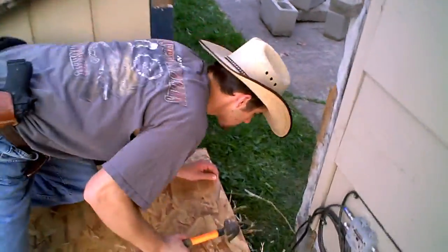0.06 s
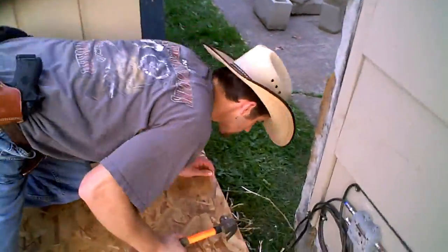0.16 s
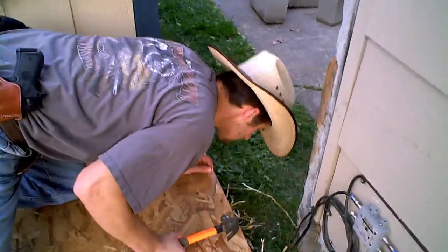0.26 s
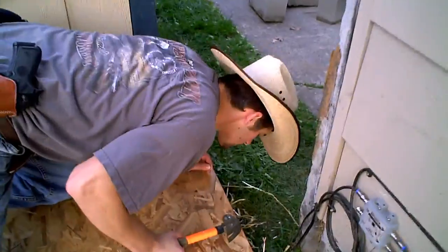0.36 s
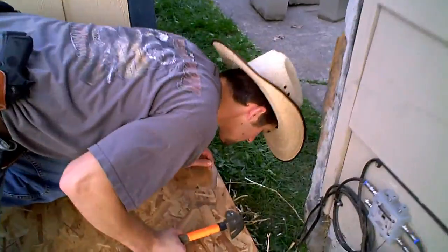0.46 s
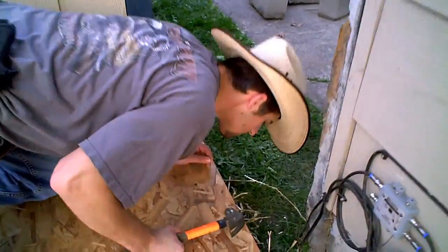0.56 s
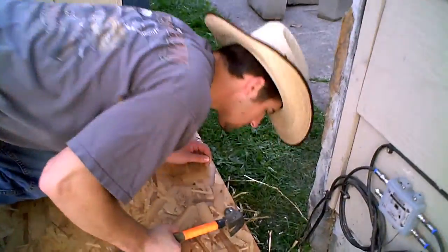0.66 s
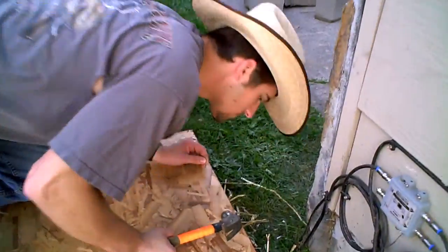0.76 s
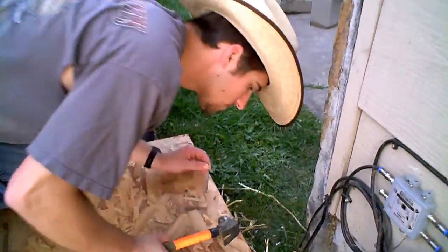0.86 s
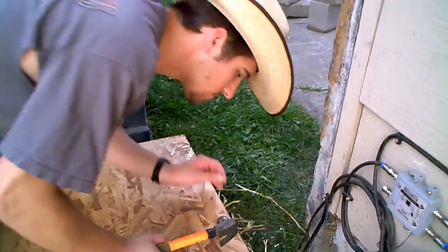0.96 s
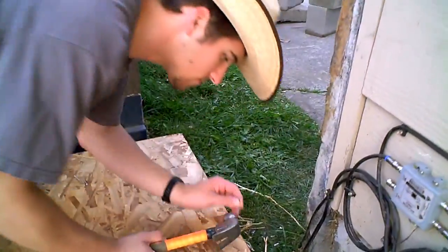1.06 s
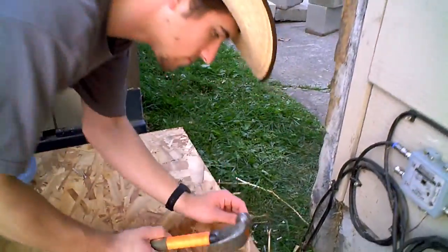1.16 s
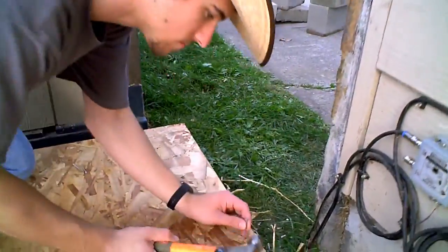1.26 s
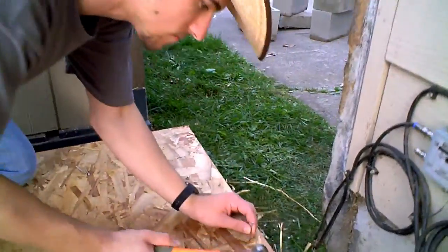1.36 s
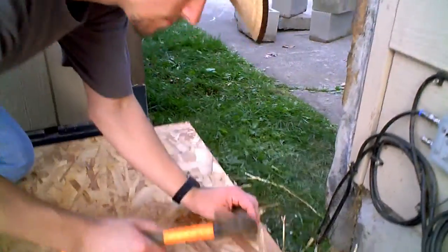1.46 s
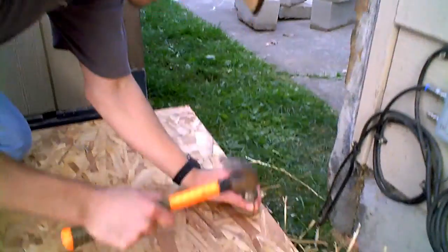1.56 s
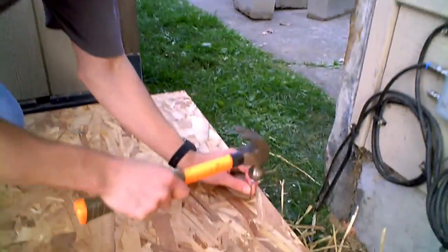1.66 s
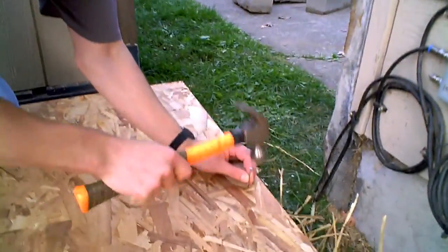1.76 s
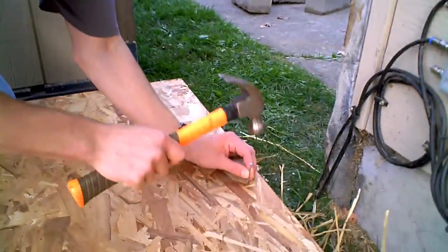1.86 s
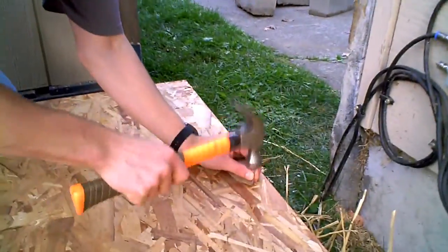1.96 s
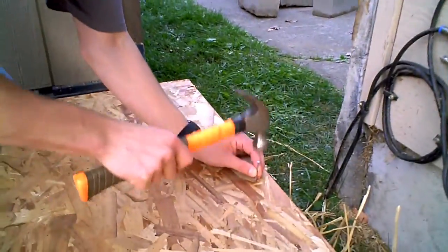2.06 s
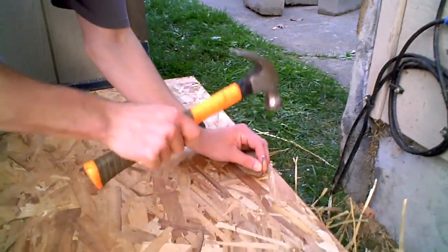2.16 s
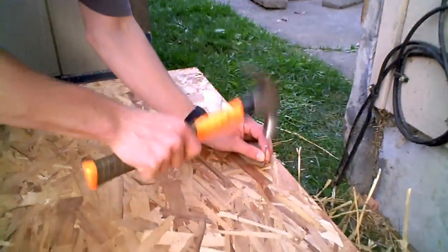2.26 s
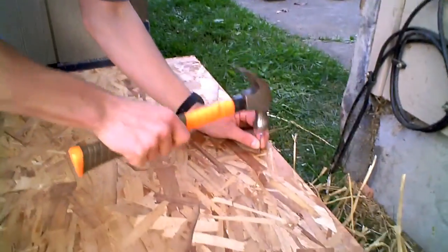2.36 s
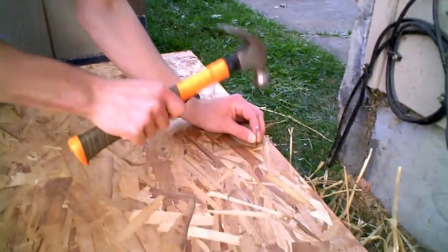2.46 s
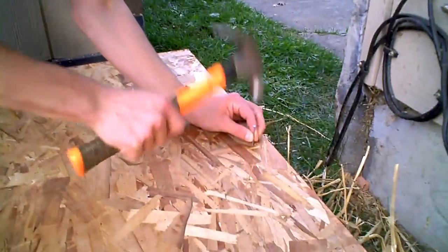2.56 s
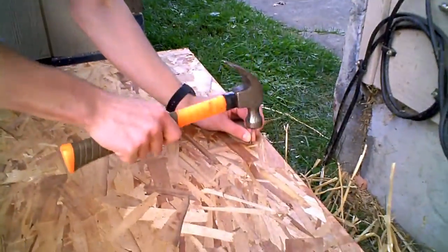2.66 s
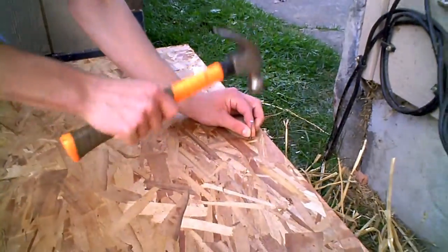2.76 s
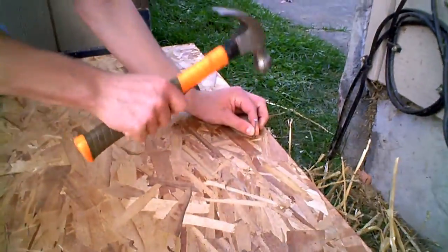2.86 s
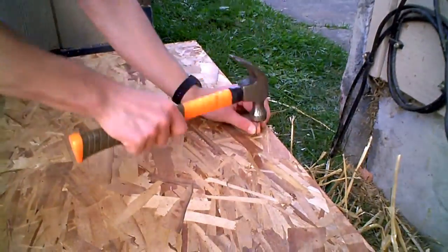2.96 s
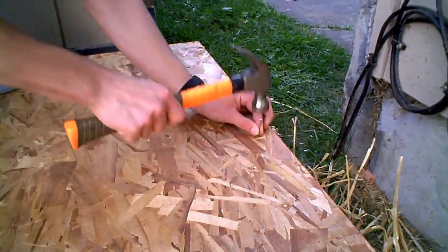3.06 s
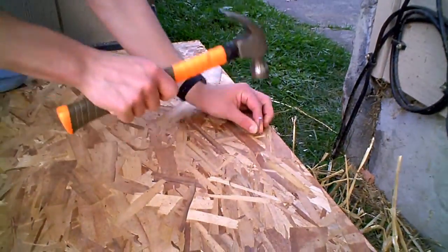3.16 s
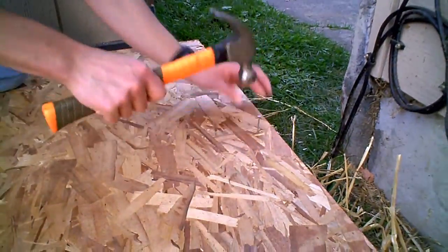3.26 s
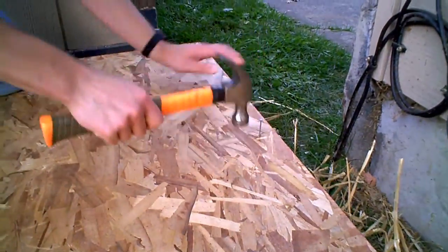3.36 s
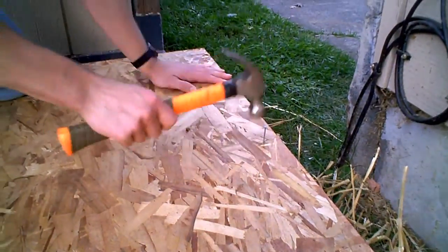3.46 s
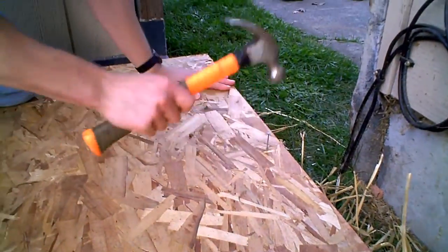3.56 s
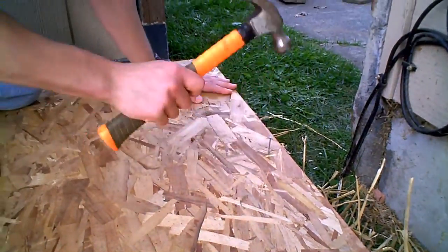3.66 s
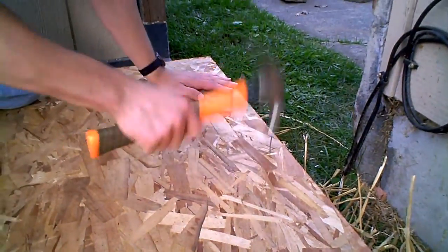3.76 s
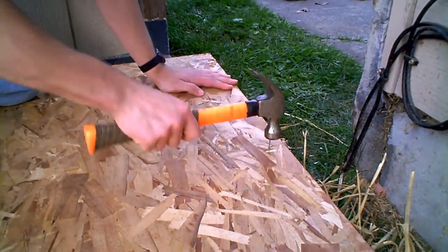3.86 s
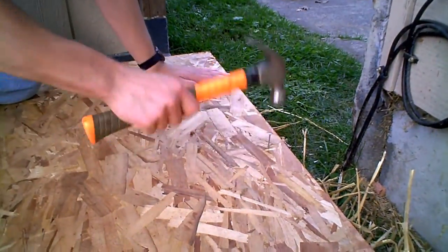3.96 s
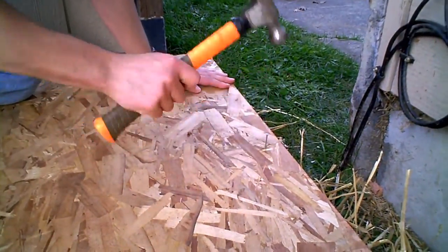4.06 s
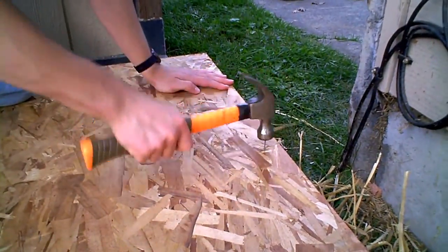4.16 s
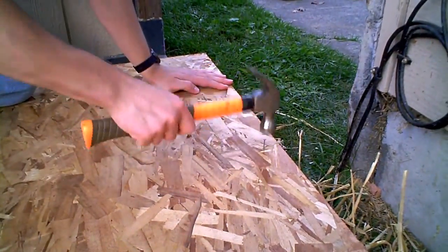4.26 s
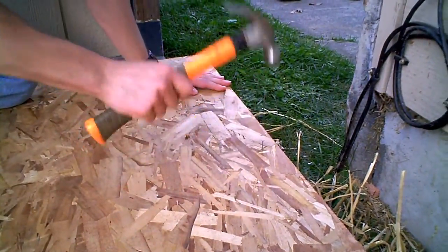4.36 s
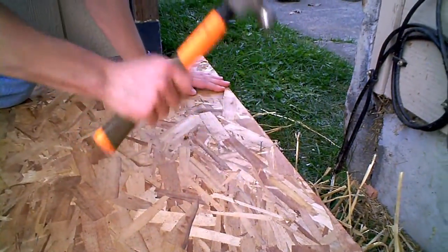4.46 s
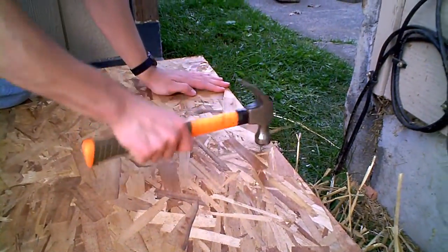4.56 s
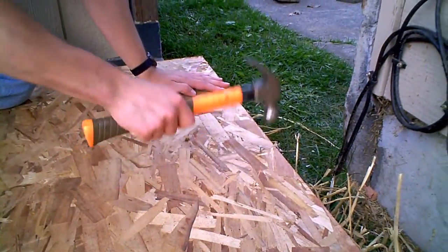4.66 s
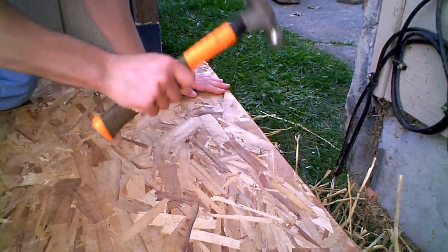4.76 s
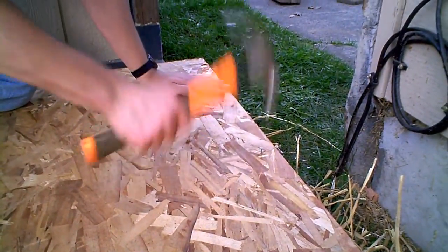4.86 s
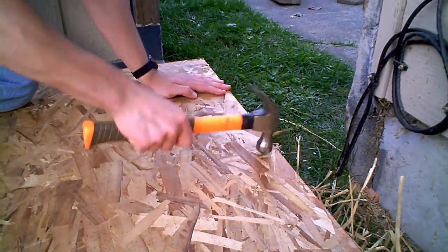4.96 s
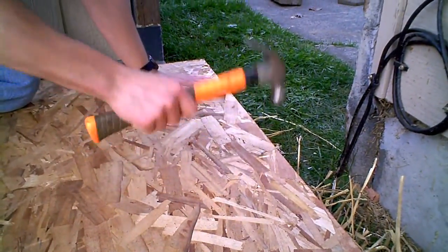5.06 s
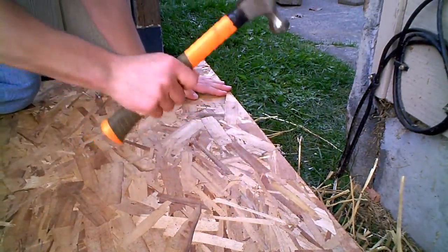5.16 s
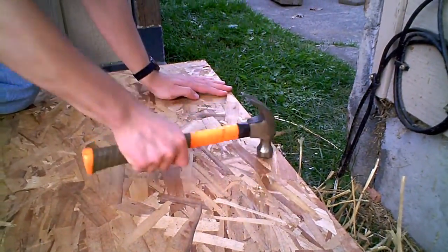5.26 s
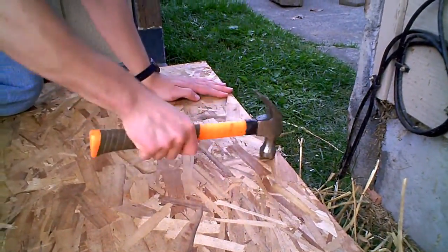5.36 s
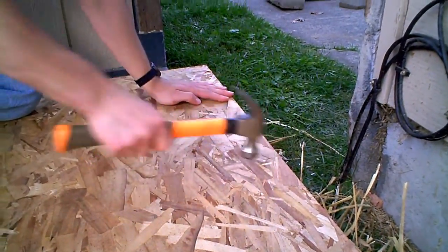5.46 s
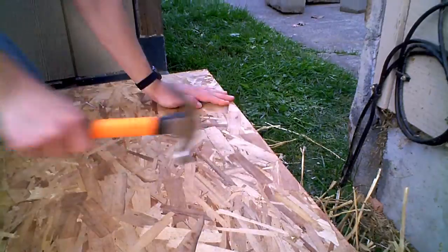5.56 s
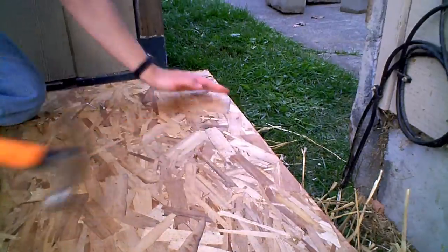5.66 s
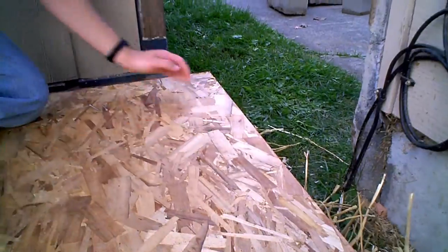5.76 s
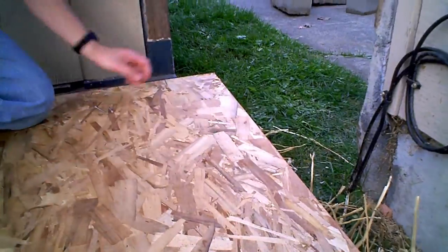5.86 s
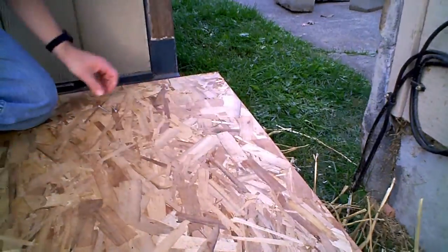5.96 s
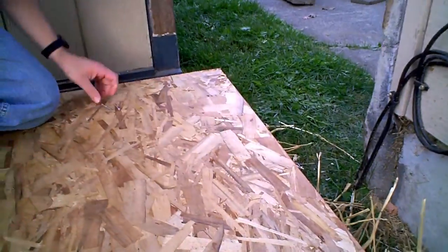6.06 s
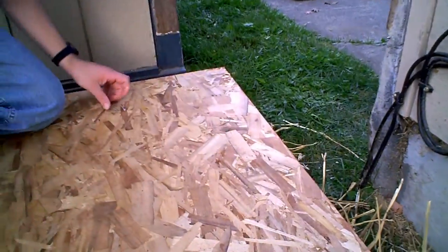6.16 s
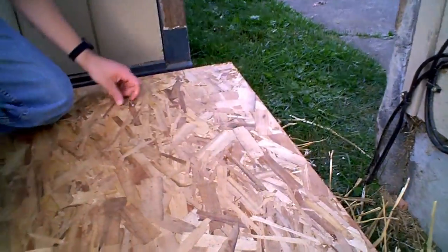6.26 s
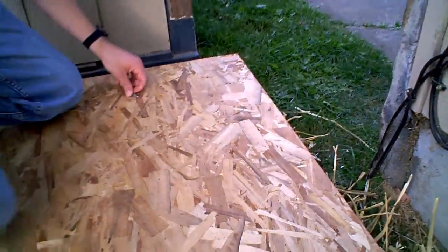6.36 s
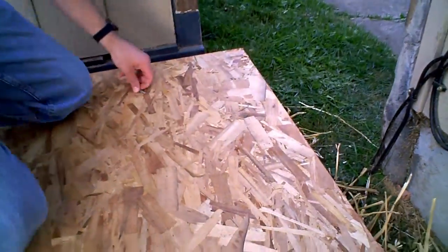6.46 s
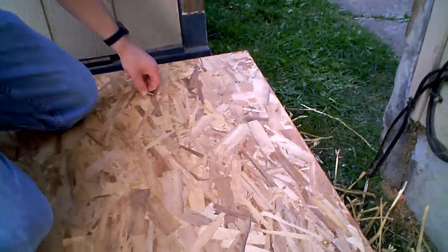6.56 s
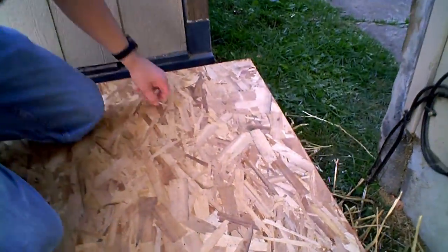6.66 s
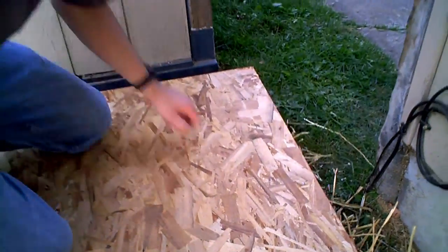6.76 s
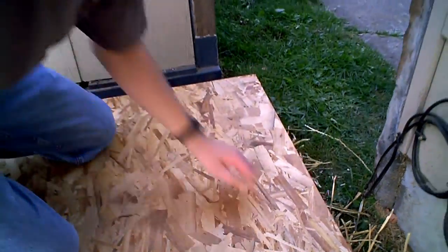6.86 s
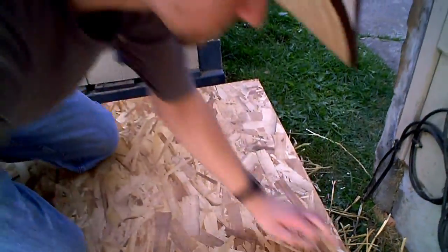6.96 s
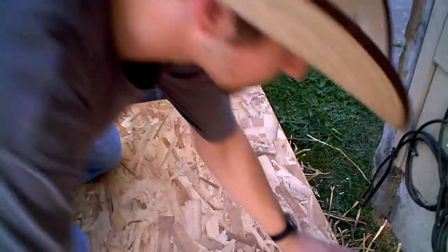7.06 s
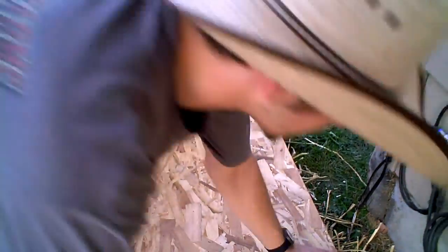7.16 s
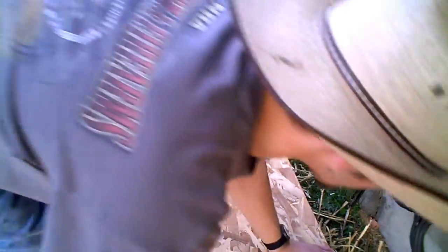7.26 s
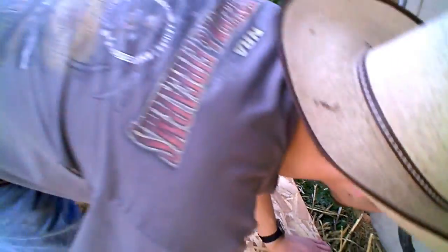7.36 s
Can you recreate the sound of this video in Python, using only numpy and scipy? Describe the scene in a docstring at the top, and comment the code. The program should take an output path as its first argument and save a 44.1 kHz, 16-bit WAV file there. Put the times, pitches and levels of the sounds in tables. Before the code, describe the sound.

Close, overloaded outdoor microphone. Over a low traffic wash and faint hum, light bumps and a soft rustle come first. Then a hammer strikes a nail in a strand board: four blows, growing quickly louder, with loose nails clicking and tinkling between them, a short pause, and five full, hard blows. Afterward come brushing, a sharp nail click, and a heavier knock on the board at the end.

```python
"""Hammering a nail into strand board

A claw hammer starts a nail in a sheet outdoors and drives it home in nine blows that overload the close
microphone: board noise and modes, a steel ring, swells of air. Loose nails click and ring as they skitter;
hands and knees bump the board or brush it as uneven noise. Behind lie a traffic wash, a faint hum and
far engine whines. Table levels apply ahead of record().
"""
import sys
import numpy as np
from scipy import signal
from scipy.fft import rfft, irfft, next_fast_len
from scipy.io import wavfile
from scipy.ndimage import uniform_filter1d

SR = 44100
rng = np.random.default_rng(int(sys.argv[2]) if len(sys.argv) > 2 else 0)


def store_wav(level_fs):
    """Save 16-bit WAV to argv[1]."""
    pcm = np.round(np.clip(np.atleast_2d(level_fs), -1, 1) * 32767)
    wavfile.write(sys.argv[1], SR, pcm.T.astype(np.int16))


N = 326781
CLOCK = np.arange(N) / SR   # s
AGE = CLOCK[:SR // 2]   # s since a contact
EDGES_HZ = 45 * 2 ** np.arange(0, 9, .5)   # half octaves
BANDS = [(np.sqrt(low * high), signal.butter(2, [low, high], "band", fs=SR, output="sos"))
         for low, high in zip(EDGES_HZ, EDGES_HZ[1:])]   # centre in Hz, filter


def from_db(db):
    """Decibels to gain."""
    return 10 ** (np.asarray(db) / 20)


def rms_one(x):
    """Scale to unit rms."""
    return x / np.sqrt(np.mean(x ** 2) + 1e-20)


def in_time(rows):
    """Each column of a curve at every sample."""
    s, *columns = np.transpose(rows)
    return [np.interp(CLOCK, s, c) for c in columns]


def at_hz(rows, hz):
    """Each column of a spectrum table at the given frequencies, interpolated in log frequency."""
    points, *columns = np.transpose(rows)
    return [np.interp(np.log(hz), np.log(points), c) for c in columns]


def add(track, s, sound):
    """Mix a sound in at a time in seconds."""
    start = max(round(s * SR), 0)
    track[start:start + len(sound)] += sound[:N - start]


def noise(spectrum, size):
    """Gaussian noise of a given colour, rms 1."""
    length = next_fast_len(size)
    hz = np.maximum(np.fft.rfftfreq(length, 1 / SR), 1)
    white = rfft(rng.standard_normal(length))
    coloured = irfft(white * from_db(at_hz(spectrum, hz)[0]), length)
    return rms_one(coloured[:size])


def drift(rate_hz):
    """Slow random wandering with a spread near 1, rate_hz knots a second."""
    knots = rng.standard_normal(N // 20)
    return np.interp(CLOCK * rate_hz, np.arange(len(knots)), knots)


def decay(t60_s):
    """An envelope that falls 60 dB in t60_s."""
    return np.exp(-np.log(1000) * AGE / t60_s)


def mode(hz, t60_s):
    """One struck resonance: a decaying sine."""
    return np.sin(2 * np.pi * hz * AGE) * decay(t60_s)


def swell(length_s, attack, release):
    """Linear rise, hold and fall; attack and release are shares of the length."""
    progress = np.linspace(0, 1, int(length_s * SR))
    return np.clip(np.minimum(progress / attack, (1 - progress) / release), 0, 1)


def tone(hz, waver):
    """A sine whose pitch wavers by a relative spread, rms 1."""
    phase_cycles = np.cumsum(hz * (1 + waver * drift(29))) / SR
    return np.sqrt(2) * np.sin(2 * np.pi * phase_cycles)


def traffic(swell_db=1.5):
    """Distant traffic: coloured noise whose level wanders about a curve."""
    # Each row: frequency in Hz, relative density in dB per Hz.
    wash_colour = [(40, 25), (70, 14.5), (110, 5), (170, -3.5), (330, -4), (550, 0.5), (850, 2.5),
                   (1200, -0.5), (2300, -15), (5000, -23.5), (8000, -28.5), (11000, -32.5), (16000, -31)]
    # Each row: time in seconds, mean level in dB.
    wash_level = [(0, -47.5), (1.5, -45.5), (3.5, -47), (5.7, -46), (7.41, -43)]
    return from_db(in_time(wash_level)[0] + swell_db * drift(5.9)) * noise(wash_colour, N)


def hum(fade_db=3.0):
    """Machine hum: a few tonal lines, each slowly wandering in level and slightly in pitch."""
    # Each row: frequency in Hz, mean level in dB.
    hum_lines = [(97, -61), (338, -77), (457, -72)]
    return sum(from_db(db + fade_db * drift(0.73)) * tone(hz, waver=0.0033) for hz, db in hum_lines)


def engine_whines(flutter_db=4.0, fade_share=0.24):
    """Far engines: fluttering tones that glide in pitch and fade in and out."""
    # Each row: start in seconds, length in seconds, first Hz, last Hz, level in dB.
    whines = [(4.694, 0.75, 916, 895, -62.5), (5.3, 0.48, 850, 800, -68.5), (6.25, 0.72, 459, 453.4, -62.5),
              (6.678, 0.237, 475, 512, -61), (7.05, 0.23, 588, 604, -53)]
    out = np.zeros(N)
    for s, length_s, first_hz, last_hz, db in whines:
        fade = np.zeros(N)
        add(fade, s, swell(length_s, fade_share, fade_share))
        glide_hz = np.interp(CLOCK, [s, s + length_s], [first_hz, last_hz])
        out += fade * from_db(db + flutter_db * drift(12)) * tone(glide_hz, waver=0.0024)
    return out


def brushing(catch_db=2.5, attack=0.18, release=0.39):
    """Sleeve and hand catch unevenly on the rough strands: noise under a fluttering pressure."""
    # Each row: start in seconds, length in seconds, level in dB.
    strokes = [(0, .95, -73.5), (.9, 0.62, -70), (3.129, 0.095, -63), (3.374, 0.043, -49.5),
               (5.566, 0.063, -71), (6.104, 0.058, -58.5), (6.15, 0.39, -60.5), (6.788, 0.38, -64.5)]
    # Each row: frequency in Hz, relative density in dB per Hz.
    brush_colour = [(300, -1), (1500, 7.5), (3800, 5), (6000, -0.5), (9000, -4), (12000, -15.5),
                    (16000, -20)]
    pressure = np.zeros(N)
    for s, length_s, db in strokes:
        add(pressure, s, from_db(db) * swell(length_s, attack, release))
    return pressure * from_db(catch_db * drift(300)) * noise(brush_colour, N)


def skitter(start_s, length_s, first_db, count=32, gap_s=.012, uneven=.6, scatter_db=3.5, settle_db_per_s=18):
    """A nail rocks from head to point at uneven gaps, more lightly as it settles: (s, dB) of each touch."""
    gap_chance, size_chance = rng.standard_normal((count, 2)).T
    gaps_s = gap_s * np.exp(uneven * gap_chance)
    ages_s = np.cumsum(gaps_s) - gaps_s[0]
    levels_db = first_db - settle_db_per_s * ages_s + scatter_db * size_chance
    return [(start_s + age, db) for age, db in zip(ages_s, levels_db) if age < length_s]


def loose_nails(ring_db=-5, click_db=-7, click_t60_s=0.037, scatter_db=3):
    """Every touch of a nail on the sheet is a dry click and a short modal ring."""
    # Hard landings. Each row: time in seconds, level in dB.
    landings = [(1.2246, -49.5), (2.6296, -39), (2.6434, -31), (2.6947, -39.5), (2.727, -41.5),
                (2.7416, -39.5), (2.7661, -42.5), (2.9702, -34.5), (2.981, -34), (3.016, -45), (3.037, -38),
                (3.109, -44), (6.2926, -51), (6.322, -42), (6.4932, -28.5)]
    # Runs of touches set off by a blow. Each row: start in seconds, length in seconds, level of first touches in dB.
    skitters = [(2.323, .07, -50), (2.659, .155, -51), (2.949, 0.26, -47.5)]
    # Nail on board. Each row: frequency in Hz, relative level in dB, t60 in seconds.
    nail_modes = [(1906, -2.5, 0.019), (2250, -12.5, 0.036), (3300, -1.5, 0.011), (3720, -14, 0.02),
                  (4180, -28.5, .02), (5040, -4, 0.01), (5760, -3.5, 0.01), (7930, -9.5, 0.0065),
                  (12300, -33.5, .12)]
    # Each row: frequency in Hz, relative density in dB per Hz.
    click_colour = [(700, 14.5), (2000, 24.5), (5500, 7), (9000, -15), (15000, -42)]
    touches = landings + [touch for row in skitters for touch in skitter(*row)]
    out = np.zeros(N)
    for s, touch_db in touches:
        ring = np.zeros(len(AGE))
        for hz, db, t60_s in nail_modes:
            strength = from_db(db + scatter_db * rng.standard_normal())
            ring += rng.choice([-1, 1]) * strength * mode(hz, t60_s)
        click = noise(click_colour, len(AGE)) * decay(click_t60_s)
        add(out, s, from_db(touch_db) * (from_db(ring_db) * ring + from_db(click_db) * click))
    return out


def struck_sheet(colour_db, grain, wave_s, mode_db, dispersion=0.26, likeness=0.5, scatter_db=0.5,
                 yard_db=-37, yard_t60_s=.3):
    """One blow on the board: a first bending wave, the ringing that follows, and a dull tail from the yard."""
    # Centres of thud, knock, clack and crack in Hz.
    colour_hz = [230, 550, 1300, 4000]
    # Dense bending modes. Each row: frequency in Hz, first wave in dB, ringing in dB, t60 in seconds.
    dense_modes = [(70, -10.5, 3.5, 0.092), (130, -7, -5.5, 0.18), (230, -13, -7, 0.15),
                   (354, -6.5, -4, 0.13), (510, -8.5, 1, 0.084), (1000, -2, -8, 0.12),
                   (1730, 0, -7.5, 0.082), (2570, -2, -17.5, 0.14), (4500, 2.5, -19.5, 0.13),
                   (6000, -12, -20, 0.082), (7940, -3.5, -28, 0.17), (10600, -14.5, -27, 0.13),
                   (15660, -17.5, -35, .09)]
    # Strongest modes. Each row: frequency in Hz, relative level in dB, t60 in seconds.
    strong_modes = [(105.7, 12, 0.22), (149.5, 6.5, 0.18), (207, -10, 0.1), (301, -5.5, 0.14),
                    (337, 0.5, 0.095), (471.1, 2.5, 0.092), (574, 2.5, .1), (762.4, -6, 0.13),
                    (894, -4, 0.038), (1022.3, 0, 0.094), (1330, -9.5, 0.044), (1562, -2.5, 0.022),
                    (1830, -6.5, 0.04)]
    colour = list(zip(colour_hz, colour_db))
    # blows near one spot excite much the same modes
    white = np.sqrt(likeness) * grain + np.sqrt(1 - likeness) * rng.standard_normal(grain.shape)
    out = np.zeros(len(AGE))
    for k, (hz, band) in enumerate(BANDS):
        wave_db, ring_db, t60_s = at_hz(dense_modes, hz)
        field = signal.sosfilt(band, white[k % 2])[-len(AGE):]
        local_power = uniform_filter1d(field ** 2, int(SR * (.012 + 4 / hz)))
        field = field / np.sqrt(local_power + 1e-12)   # even out the noise level
        arrival_s = wave_s * (1000 / hz) ** dispersion   # bending waves are slower at low pitch
        wave = np.sqrt(AGE / arrival_s) * np.exp((1 - (AGE / arrival_s) ** 2) / 4)
        yard = from_db(yard_db + wave_db) * decay(yard_t60_s)
        ringing = (1 - np.exp(-AGE / arrival_s)) * (from_db(ring_db) * decay(t60_s) + yard)
        out += from_db(at_hz(colour, hz)[0]) * field * np.hypot(from_db(wave_db) * wave, ringing)
    for k, (hz, db, t60_s) in enumerate(strong_modes):
        strength = from_db(db + mode_db + at_hz(colour, hz)[0] + scatter_db * rng.standard_normal())
        out += (-1) ** k * strength * mode(hz, t60_s) * (1 - np.exp(-2 * AGE / wave_s))
    return out


def bumps(grain):
    """Light contacts of hands, knees and nails ring the same board without making it heave."""
    # Each row: time in seconds, thud, knock, clack and crack in dB.
    contacts = [(0.001, -36.5, -59, -83, -78), (0.112, -33, -39.5, -47, -58), (0.973, -45.5, -44, -53, -81),
                (3.384, -38, -49.5, -50, -45), (6.468, -58, -49, -50, -68), (6.4937, -72, -62, -59, -38.5),
                (6.551, -53, -54, -47, -73), (7.086, -46, -48, -38.5, -59), (7.166, -36.5, -33.5, -60, -85),
                (7.2327, -24, -20.5, -29.5, -49.5)]
    out = np.zeros(N)
    for s, *colour_db in contacts:
        add(out, s, struck_sheet(colour_db, grain, wave_s=0.0011, mode_db=-7.0))
    return out


def steel(slip_s, scatter_db=3, contact_db=1, contact_t60_s=0.0068):
    """A sharp tick as the face meets the nail, then a brief ring that builds while the nail slips into the wood."""
    # Hammer head and nail. Each row: frequency in Hz, relative level in dB, t60 in seconds.
    steel_modes = [(2568, -6, .018), (3046, -5, .02), (3450, -4, .018), (3666, -5, .02), (4606, -1, .02),
                   (4891, -3, .018), (7648, -7, .022), (8132, -6, .024)]
    # Steel meeting steel. Each row: frequency in Hz, relative density in dB per Hz.
    contact_colour = [(800, -12), (3000, -1.5), (9000, 0.5), (15000, -10)]
    ring = np.zeros(len(AGE))
    for hz, db, t60_s in steel_modes:
        ring += from_db(db + scatter_db * rng.standard_normal()) * mode(hz, t60_s)
    tick = from_db(contact_db) * noise(contact_colour, len(AGE)) * decay(contact_t60_s)
    return ring * (1 - np.exp(-AGE / slip_s)) + tick


def heaving_air(slip_s):
    """The heaving sheet pushes slow swells of air at the microphone: sines under bell-shaped envelopes."""
    # Each row: frequency in Hz, zero crossing, centre and width in seconds, relative level in dB.
    air_swells = [(108, .0178, .0165, .0062, 2), (52, .0155, .028, .018, -6)]
    air = np.zeros(len(AGE))
    for hz, crossing_s, centre_s, width_s, db in air_swells:
        bell = np.exp(-((AGE - centre_s) / width_s) ** 2)
        air += from_db(db) * np.sin(2 * np.pi * hz * (crossing_s - AGE)) * bell
    return air * (1 - np.exp(-AGE / slip_s))


def hammer(grain, slip_s=0.0005, slap_s=.0185, slap_dull_db=-7, chatter_db=3,
           full_heave_db=-4, loose_nail_loss_db=10, bite_blows=1.0):
    """Each blow rings steel and board; the sheet heaves, then slaps back on its frame."""
    # Each row: time in seconds, thud, knock, clack and crack in dB, slap-back in dB relative to the blow.
    blows = [(1.9485, -20, -28, -25, -35, -37), (2.2599, -18, -15, -13.5, -25.5, -35),
             (2.5684, -16.5, -11, -12.5, -19, -31), (2.8926, -16, -6.5, -8, -18.5, -25),
             (3.7500, -17, -10, -17, -16.5, -15.5), (4.1281, -17, -19, -18.5, -18.5, -12.5),
             (4.497, -18, -19, -21.5, -17.5, -13.5), (4.8601, -15.5, -15.5, -18, -19.5, -23.5),
             (5.221, -15, -5.5, -12.5, -12.5, -24.5)]
    out = np.zeros(N)
    air = heaving_air(slip_s)
    for k, (s, thud_db, knock_db, clack_db, crack_db, slap_db) in enumerate(blows):
        # the sheet heaves more once the nail has bitten
        heave_db = full_heave_db - loose_nail_loss_db * np.exp(-k / bite_blows)
        board = struck_sheet((thud_db, knock_db, clack_db, crack_db), grain, wave_s=0.0039, mode_db=-4.5)
        add(out, s, board + from_db(crack_db) * steel(slip_s) + from_db(heave_db) * air)
        # wood on wood is duller than steel
        slap_colour_db = (thud_db, knock_db, clack_db, crack_db + slap_dull_db)
        slap = struck_sheet(slap_colour_db, grain[::-1], wave_s=.006, mode_db=-12)
        chatter = chatter_db * drift(500)[:len(AGE)]   # the edge chatters as it lands
        add(out, s + slap_s, slap * from_db(slap_db + chatter))
    return out


def scene():
    """The work on the sheet over the outdoor background."""
    grain = rng.standard_normal((2, len(AGE) + SR // 10))   # the board's own pattern of dense modes
    background = traffic() + hum() + engine_whines()
    return (background + brushing() + loose_nails() + bumps(grain) + hammer(grain))[None]


def record(dry, ceiling=.42, low_cut_hz=195, dull_hz=12500, cutoff_hz=16200):
    """The microphone saturates on the blows; a low cut then turns the flattened swells into short kicks."""
    squashed = dry / (1 + (dry / ceiling) ** 6) ** (1 / 6)
    thinned = signal.sosfilt(signal.butter(4, low_cut_hz, "high", fs=SR, output="sos"), squashed)
    dulled = signal.sosfilt(signal.butter(2, dull_hz, fs=SR, output="sos"), thinned)
    return signal.sosfilt(signal.ellip(10, .1, 80, cutoff_hz, fs=SR, output="sos"), dulled)


dry = scene()
out = record(dry)
store_wav(out)
```